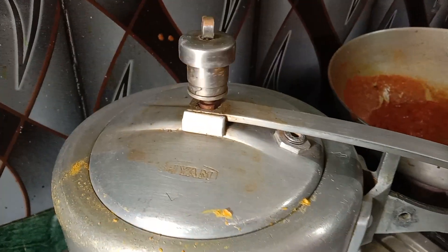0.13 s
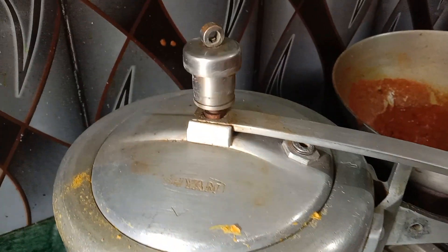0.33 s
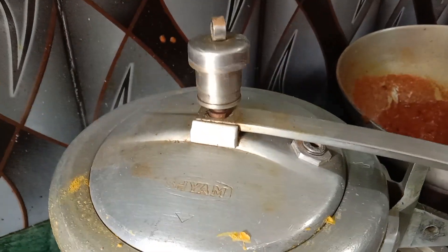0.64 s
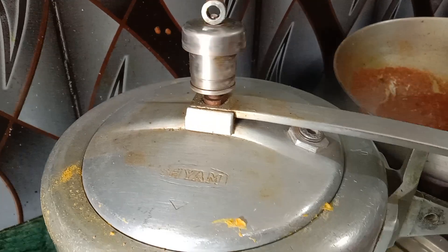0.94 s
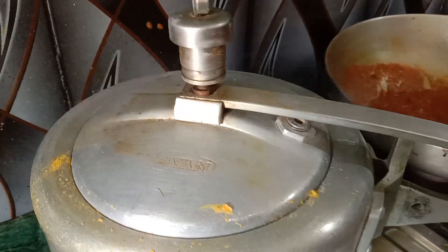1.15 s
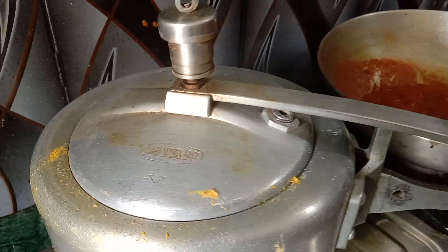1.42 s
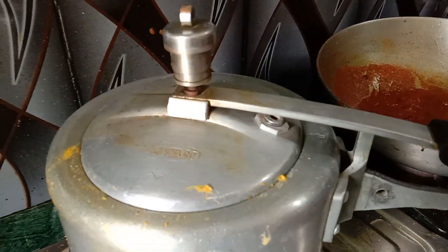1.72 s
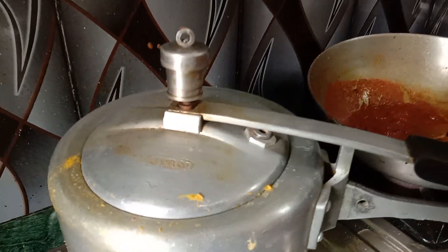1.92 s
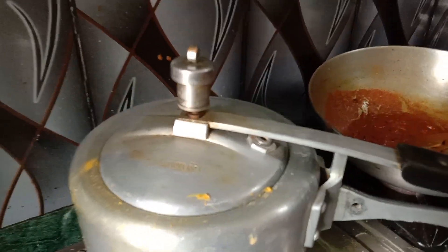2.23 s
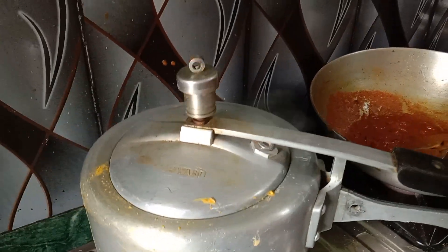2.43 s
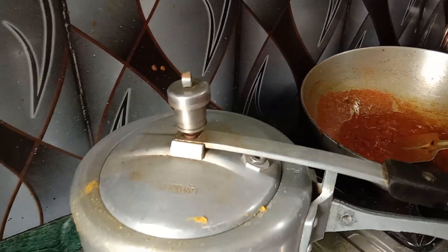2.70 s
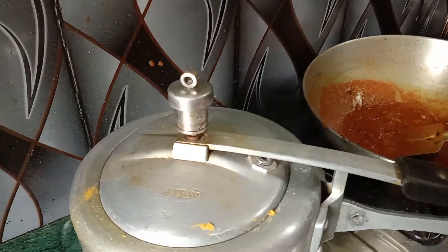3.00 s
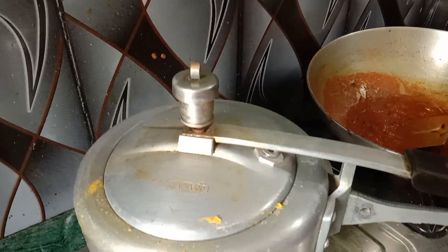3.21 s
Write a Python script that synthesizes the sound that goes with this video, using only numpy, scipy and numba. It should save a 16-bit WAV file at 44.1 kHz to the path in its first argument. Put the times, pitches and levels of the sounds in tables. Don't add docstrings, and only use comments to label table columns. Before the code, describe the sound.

A pressure cooker hisses throughout, close to a mono phone in a tiled kitchen. The bright, crackling steam pulses unevenly every 0.1-0.25 seconds, strongest near 1.2 and 2.2, thinner around 1.4 and 2.45. Each swell puffs hollowly against the lid, with faint metallic ringing from the weight. Low traffic rumbles faintly, a vehicle drones by around 0.7-1.1, and a pan is tapped at 3.33, just before the end.

```python
import sys
import numpy as np
from scipy import signal
from scipy.fft import rfft, irfft
from scipy.io import wavfile
from scipy.ndimage import uniform_filter1d
from numba import njit

SR = 44100
rng = np.random.default_rng(int(sys.argv[2]) if len(sys.argv) > 2 else 0)


def dump(signal):
    limited = np.clip(np.atleast_2d(signal).T, -1, 1)
    pcm = np.round(limited * 32767).astype(np.int16)
    wavfile.write(sys.argv[1], SR, pcm)


def linear_from_db(decibels):
    return 10 ** (np.asarray(decibels, float) / 20)


N = 147735

# pitch_hz, level_db [dB per Hz]
ROOM_TONE = [(18, -41), (30, 0), (49, -12), (108, 2), (409, -5), (500, 1), (650, -37), (1100, -120)]
# time_s, level_db
TRAFFIC_SWELL = [
    (0, 0.5),
    (.6, -3),
    (.85, 10),
    (1.3, 0.5),
    (1.75, 4),
    (1.95, 0),
    (3.35, -2.5),
]
# time_s, pitch_hz, level_db
ENGINE = [
    (.68, 139.7, -72),
    (.76, 139.5, -61),
    (.83, 131, -57),
    (.87, 114.3, -52),
    (1.03, 114.4, -53),
    (1.08, 113, -72),
]
# pitch_hz, level_db, t60_s
PAN_MODES = [(472, -8, 0.14), (1250, -11, .06), (1940, 12, 0.046), (2420, 1, 0.066)]
# peak_s, half_length_s, jet_level_db, lid_puff_db [re jet]
WOBBLES = [(0, 0.13, -15, 1), (0.19, 0.072, -15, 0), (0.313, .065, -20, -5.5), (0.465, 0.073, -20, 3.5),
           (0.538, 0.11, -21.5, -5.5), (0.639, 0.057, -18, -14), (.77, 0.071, -15.5, -3),
           (0.907, 0.089, -14, 1.5), (1.079, .085, -16, -1.5), (1.231, 0.078, -12, 0),
           (1.337, .06, -24, -17), (1.438, .05, -31.5, 11.5), (1.582, 0.076, -16.5, -1),
           (1.759, 0.081, -15, 2.5), (1.92, 0.098, -14.5, 1.5), (2.053, 0.081, -21.5, 1),
           (2.208, .08, -9, 1), (2.45, 0.096, -30.5, 7), (2.593, 0.096, -22, 3), (2.798, 0.083, -16.5, -2),
           (2.955, 0.098, -16.5, 2), (3.143, 0.086, -14.5, 1.5), (3.32, 0.046, -21, 3.5)]
# time_s, level_db, colour_shift_db [+ lifts resonances of positive share, lowers
SEAT_LEAK = [(0, -26, -0.5), (.38, -24.5, -0.2), (.5, -23.5, -1), (.85, -19, -1.), (1.1, -24.5, -0.7),
             (1.4, -21, -0.9), (1.66, -23, -0.54), (2.0, -22, 0.06), (2.35, -21.5, 0.07),
             (2.8, -21.5, -0.2), (3.05, -20.5, 0), (3.35, -21, 0.2)]
# peak_s, half_length_s, level_db, deep_part_db
STEAM_GUSTS = [(.01, 0.096, -40, -9), (0.193, 0.06, -42.5, 3), (0.325, .05, -55, -4),
               (0.5, 0.087, -45.5, -5.5), (0.656, 0.034, -47, -6), (0.744, 0.049, -41, -16),
               (.78, .04, -46.5, 9.5), (0.921, 0.058, -38, 4), (1.072, 0.042, -44, 3),
               (1.245, 0.064, -36.5, -2.5), (1.404, 0.15, -52, -1.5), (1.564, 0.11, -46, -6),
               (1.766, 0.083, -40, -2.5), (1.923, 0.1, -42.5, -2), (2.06, 0.07, -49, -13),
               (2.215, 0.073, -40.5, -4), (2.438, .06, -59, -10), (2.626, 0.054, -53, -6),
               (2.805, 0.089, -45, 1), (2.95, 0.091, -37.5, -4.5), (3.158, 0.1, -44, 3),
               (3.34, .06, -45.5, 0.5)]
# pitch_hz, width_hz, level_db
LID_SHELL = [(1259, 101, 1), (1440, 213, -3.5), (1570, 247, -2), (1900, 310, -9), (2142, 296, -7.5),
             (2690, 400, -15.5)]
# pitch_hz, width_hz, level_db
LID_HOLLOW = [(519, 112, -4), (708, 150, 0.5), (1024, 156, -2)]
# pitch_hz, width_hz, level_db
LID_DEEP = [(233, 147, -5), (362, 99, 3)]
# [dB per dB of colour shift, halved]
JET_GAP = [(3420, 438, -11.5, -0.075), (3940, 570, -10, .3), (4443, 585, -9, 0.37), (5177, 322, -1, -0.62),
           (5413, 400, -7, -0.51), (5867, 370, -3, -1), (6600, 510, -9.5, -0.46), (7245, 510, -3.5, 1.1),
           (8566, 1220, -15.5, -0.36), (9390, 780, -7, -0.12), (10404, 840, -7.5, 2.7),
           (11440, 610, -17, .3), (12780, 1550, -12.5, -0.28), (14970, 2200, -17, 0.42)]
# pitch_hz, width_hz, level_db
WEIGHT_RINGS = [(1280, 60, -14), (5096, 50, -2), (5296, 50, 0), (5410, 40, -3), (5945, 60, -2),
                (6442, 40, -5), (6696, 40, -5), (7009, 50, -4), (7120, 40, -3), (7236, 40, -3),
                (7345, 50, -3), (9505, 50, -6)]

SWELL_ROUND, FALL_SHARE = 0.55, 0.79
PUFF_POINT = 1.9
DROPS_PER_S, DROP_SCATTER_DB, DROP_CAP = 1500, 2.5, 2.0


def level(x, db):
    return x * linear_from_db(db) / np.sqrt(np.mean(x ** 2))


def walk(rate_hz):
    hold = int(SR / rate_hz)
    steps = np.repeat(rng.standard_normal(N // hold + 1), hold)
    slewed = uniform_filter1d(uniform_filter1d(steps, hold), hold)
    return 1.315 * slewed[:N]


@njit
def bandpass(x, hz, width_hz):
    y, band, low = np.empty(len(x)), 0., 0.
    g, k = np.tan(np.pi * hz / SR), width_hz / hz
    for i in range(len(x)):
        v = (band + g * (x[i] - low)) / (1 + g * (g + k))
        band, low, y[i] = 2 * v - band, low + 2 * g * v, k * v
    return y


def resonance(x, hz, width_hz, db, flicker_db, rate_hz):
    hz, each_width = float(hz), 1.77 * width_hz
    once = bandpass(x, hz, each_width)
    return bandpass(once, hz, each_width) * linear_from_db(db + flicker_db * walk(rate_hz))


def chord(x, table, flicker_db):
    total = 0
    for k, (hz, width_hz, db) in enumerate(table):
        total = total + (-1) ** k * resonance(x, hz, width_hz, db, flicker_db, 11)
    return level(total, 0)


def swells(t, table, floor_db, extra, point):
    coarse = t[::64]
    power = linear_from_db(floor_db[::64]) ** 2
    for peak_s, half_s, db, extra_db in table:
        side_s = np.where(coarse > peak_s, FALL_SHARE * half_s, half_s)
        u = np.clip((coarse - peak_s) / side_s, -1, 1)
        shape = np.abs(np.cos(np.pi / 2 * u)) ** (4 * SWELL_ROUND * point)
        power = power + linear_from_db(db + extra * extra_db) ** 2 * shape
    return np.interp(t, coarse, np.sqrt(power))


def leak_level(t):
    return np.interp(t, *np.array(SEAT_LEAK)[:, :2].T)


def turbulence(flutter_db, drops_db):
    hit = rng.random(N) < DROPS_PER_S / SR
    sign = np.sign(rng.standard_normal(N))
    size = linear_from_db(DROP_SCATTER_DB * np.minimum(rng.exponential(size=N), DROP_CAP))
    flutter = flutter_db * walk(120) + 0.27 * flutter_db * walk(8.9)
    return rng.standard_normal(N) * linear_from_db(flutter) + level(hit * sign * size, drops_db)


def rumble():
    t = np.arange(N) / SR
    hz = np.maximum(np.arange(N // 2 + 1) * SR / N, 1)
    at_hz, db = np.array(ROOM_TONE).T
    tone = linear_from_db(np.interp(np.log(hz), np.log(at_hz), db, right=-60))
    tone = tone * np.minimum(hz / 70, 1) / (1 + (hz / 380) ** 2)
    noise = irfft(rfft(rng.standard_normal(N)) * tone, N)
    swell_db = np.interp(t, *np.array(TRAFFIC_SWELL).T)
    return level(noise, -64) * linear_from_db(0.9 * walk(4) + swell_db)


def engine_drone(t):
    at_s, pitch_hz, db = np.array(ENGINE).T
    hz = np.interp(t, at_s, pitch_hz) + 1.5 * walk(20)
    tone = np.sqrt(2) * np.sin(2 * np.pi * np.cumsum(hz) / SR)
    return tone * linear_from_db(np.interp(t, at_s, db, left=-120, right=-120) + 1.6 * walk(30))


def pan_tap(t):
    u = np.maximum(t - 3.328, 0)
    onset = 1 - np.exp(-u / 0.003)
    return sum(linear_from_db(-30.5 + db - 60 * u / t60_s) * onset * np.sin(2 * np.pi * hz * u)
               for hz, db, t60_s in PAN_MODES)


def lid(t):
    puff_air, gust_air = turbulence(0.86, -10), turbulence(1.0, -9.5)
    late = t - 0.0059
    puffs = swells(late, WOBBLES, leak_level(late) - 3.5, 1, PUFF_POINT)
    shell = chord(puff_air, LID_SHELL, 1.5) * puffs * linear_from_db(-16.5)
    floor_db = -55.5 + 0.79 * (leak_level(t) + 25)
    hollow = chord(gust_air, LID_HOLLOW, 1.2) * swells(t, STEAM_GUSTS, floor_db, 0, PUFF_POINT)
    deep_gusts = swells(t, STEAM_GUSTS, floor_db - 4.5, 0.97, PUFF_POINT)
    deep = chord(gust_air, LID_DEEP, 2.4) * deep_gusts * linear_from_db(-12)
    return shell + hollow + deep


def jet(t):
    air = turbulence(0.71, -12)
    push = swells(t, WOBBLES, leak_level(t), 0, 1)
    hiss = air * push
    over_db = 20 * np.log10(push / np.mean(push))
    shift_db = np.interp(t, *np.array(SEAT_LEAK)[:, ::2].T)
    body = 0
    for k, (hz, width_hz, db, share) in enumerate(JET_GAP):
        bright_db = 0.27 * over_db * max(np.log2(hz / 6300), 0)
        colour_db = db + 2 * share * shift_db + bright_db
        body = body + (-1) ** k * resonance(hiss, hz, width_hz, colour_db, 1.28, 10.01)
    weight_air = air[::-1] * push
    rings = sum(resonance(weight_air, hz, width_hz, db, 1.8, 6.75) for hz, width_hz, db in WEIGHT_RINGS)
    return np.sqrt(np.mean(hiss ** 2)) * (level(body, -0.69) + level(rings, -10))


def tiled_walls(steam):
    u = np.arange(SR // 2) / SR
    t60_s = 0.2
    echo = rng.standard_normal(len(u)) * linear_from_db(-60 * u / t60_s) * (u > 0.002)
    return signal.fftconvolve(steam, echo / np.sqrt(np.sum(echo ** 2)))[:N]


def scene():
    t = np.arange(N) / SR
    background = rumble() + engine_drone(t) + pan_tap(t)
    steam = lid(t) + jet(t)
    cooker = linear_from_db(0.15) * (steam + linear_from_db(-11) * tiled_walls(steam))
    return np.tile(background + cooker, (2, 1))


def top_cut(x):
    return signal.sosfilt(signal.butter(12, 16020, fs=SR, output="sos"), x)


def record(dry):
    knee_db, ratio, window_s = -17, 3.0, 0.025
    power = uniform_filter1d(dry ** 2, int(window_s * SR), axis=1, mode="reflect")
    loud = np.sqrt(power + 1e-12)
    held = dry * np.minimum(linear_from_db(knee_db) / loud, 1) ** (1 - 1 / ratio)
    low_pass = signal.ellip(16, 0.3, 90, 15510, fs=SR, output="sos")
    mix = signal.sosfilt(low_pass, held)
    return top_cut(mix)


dry = scene()
out = record(dry)
dump(out)
```